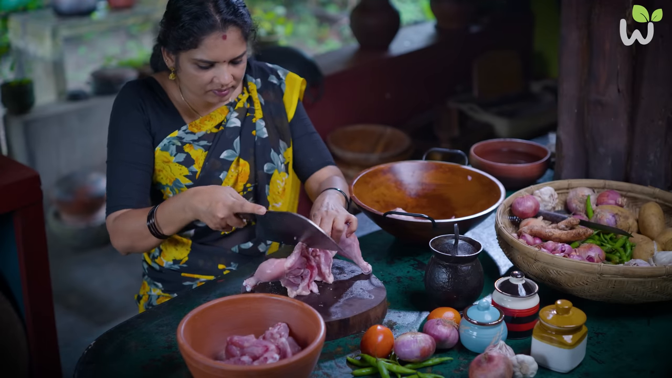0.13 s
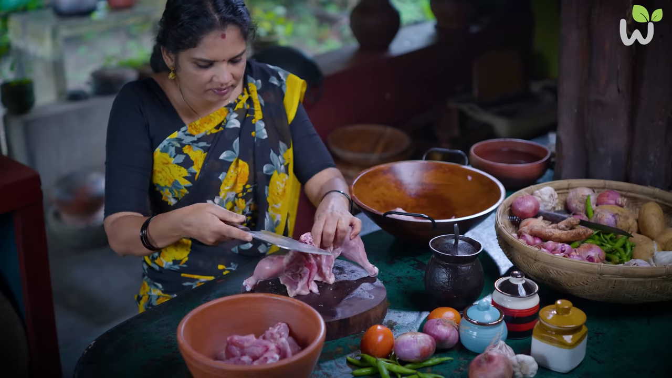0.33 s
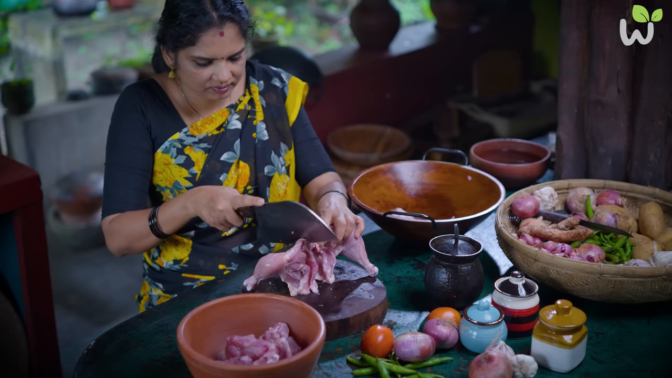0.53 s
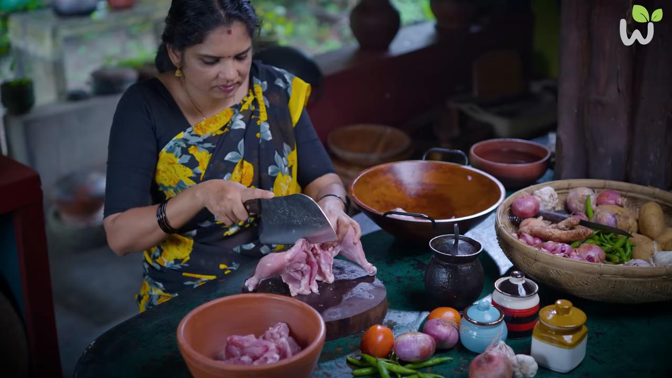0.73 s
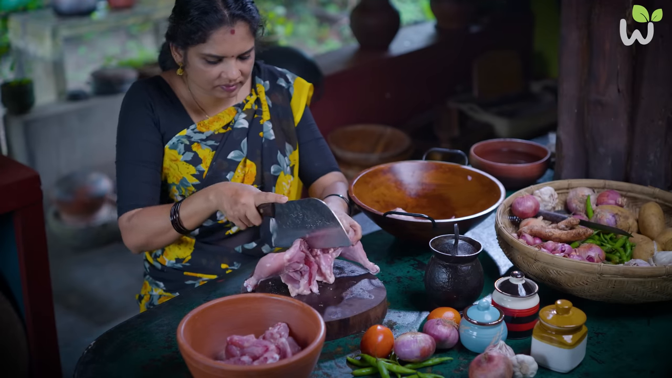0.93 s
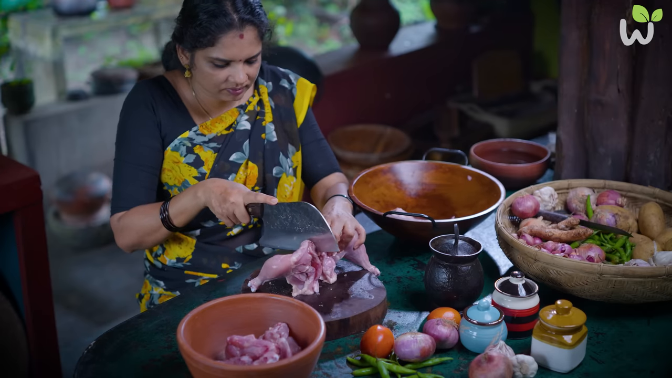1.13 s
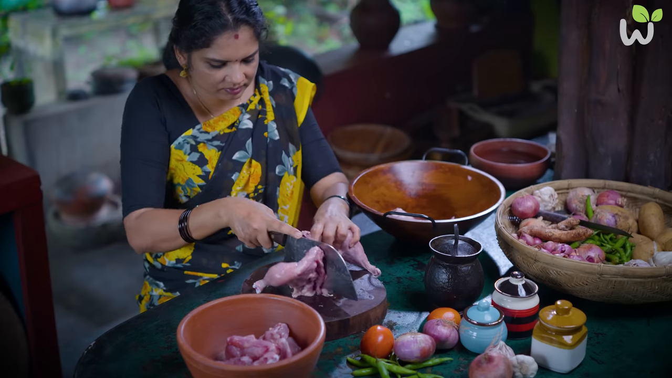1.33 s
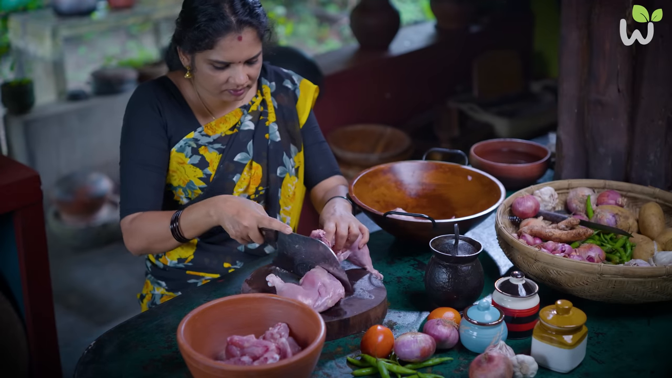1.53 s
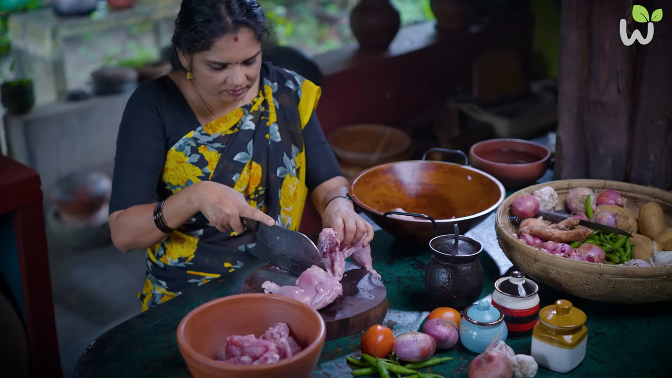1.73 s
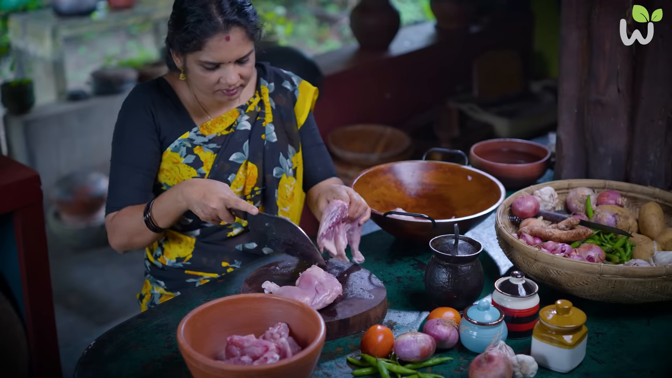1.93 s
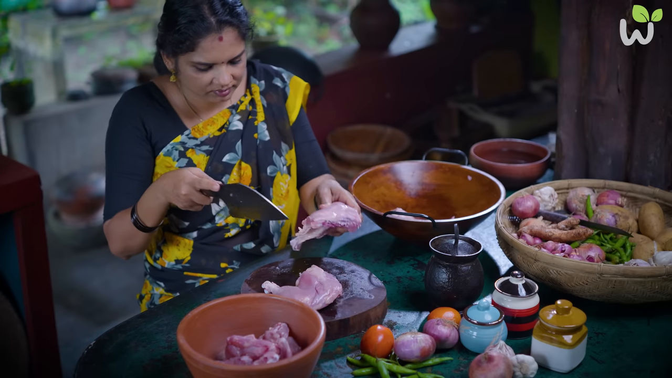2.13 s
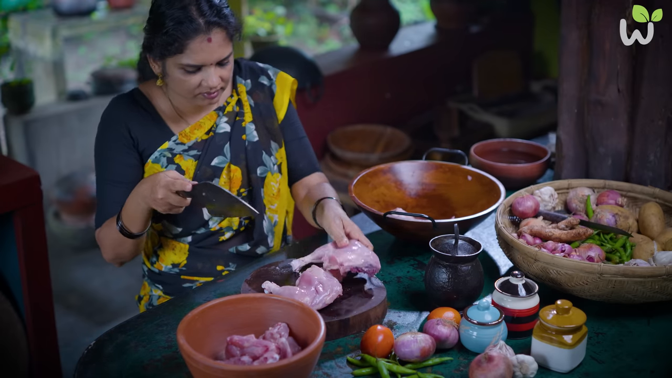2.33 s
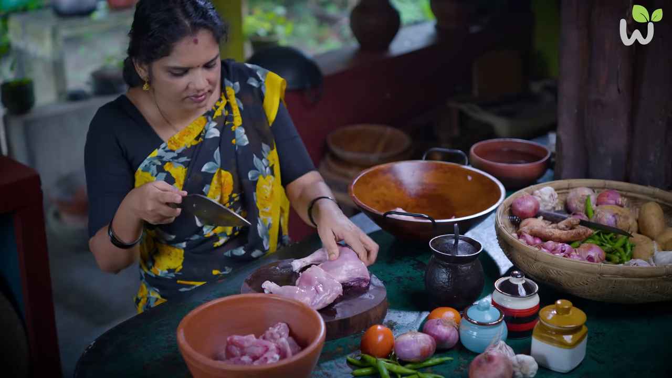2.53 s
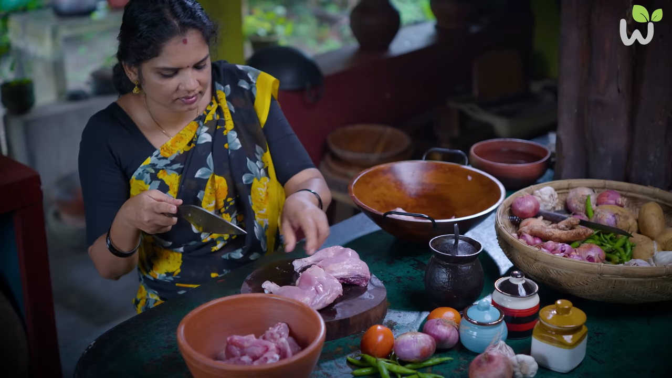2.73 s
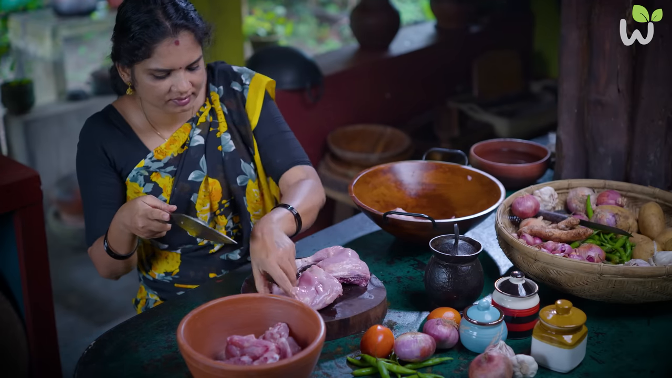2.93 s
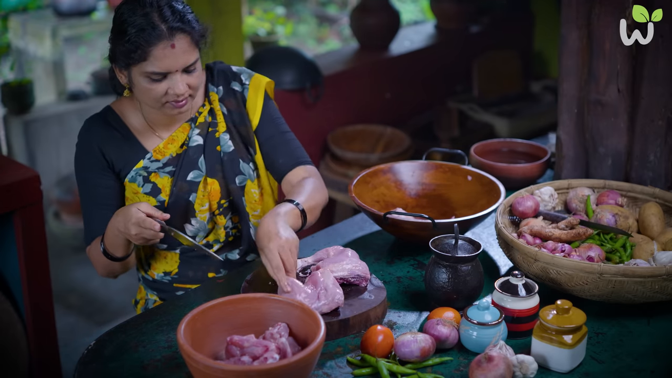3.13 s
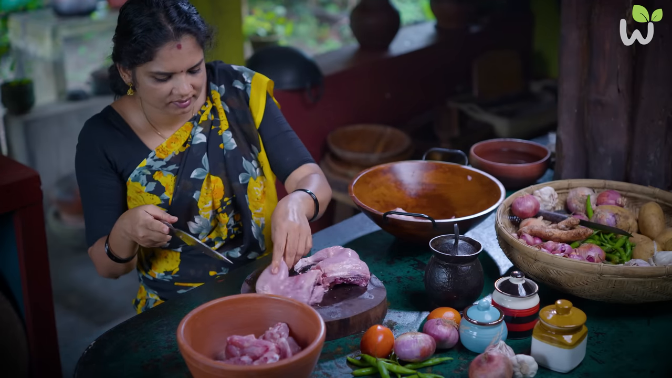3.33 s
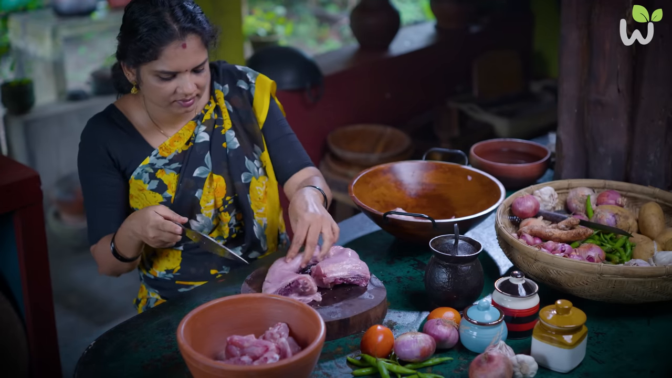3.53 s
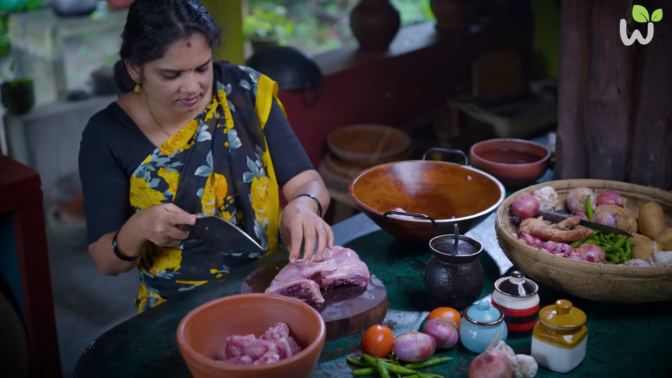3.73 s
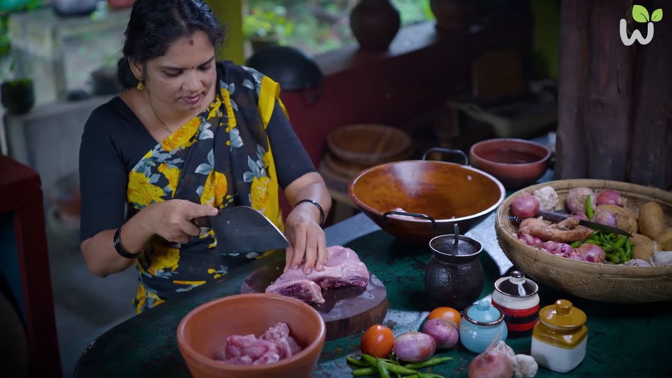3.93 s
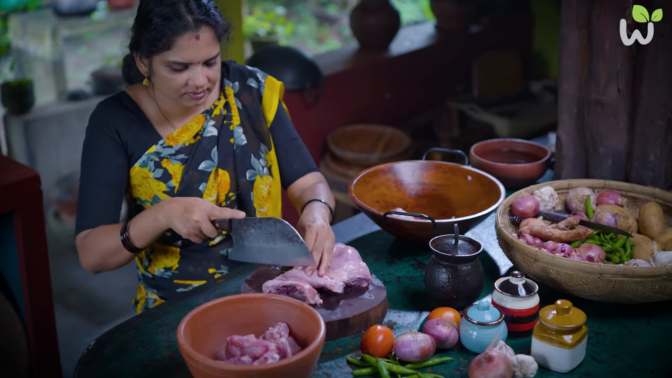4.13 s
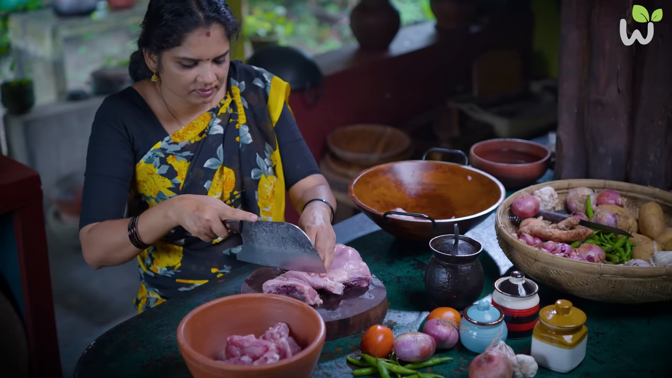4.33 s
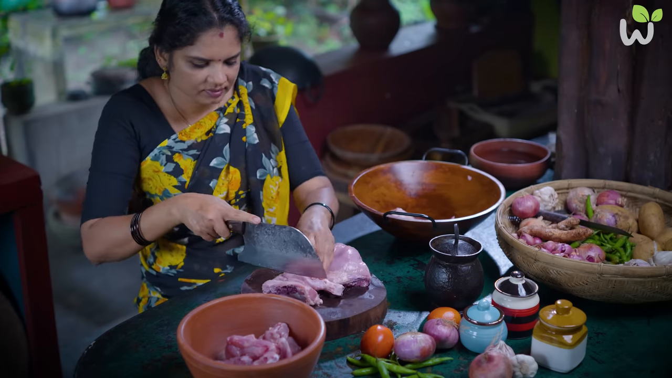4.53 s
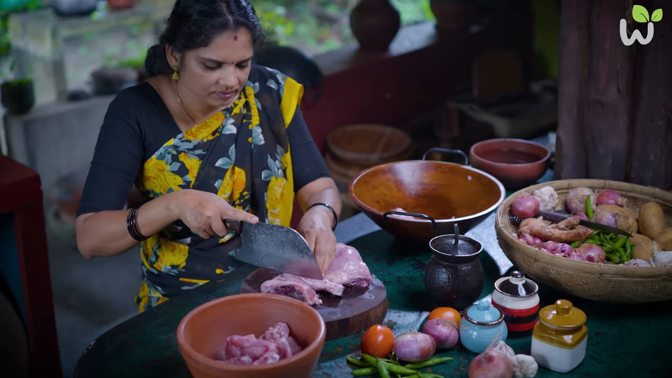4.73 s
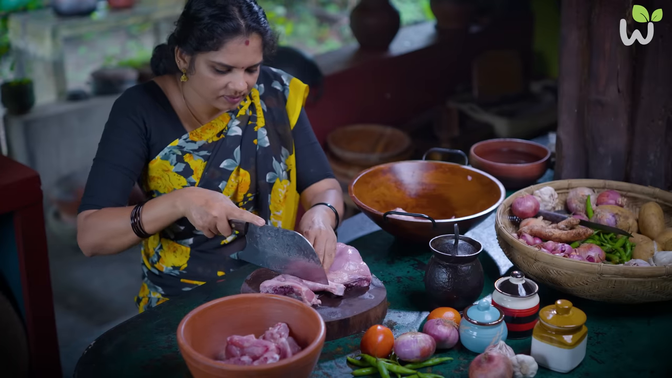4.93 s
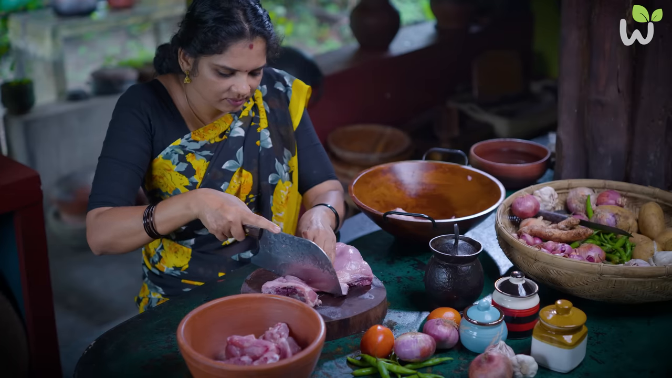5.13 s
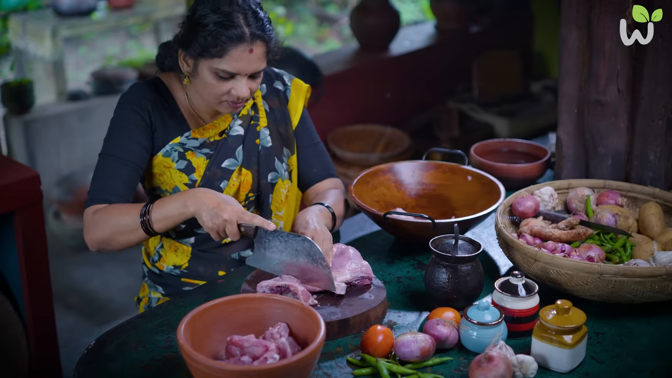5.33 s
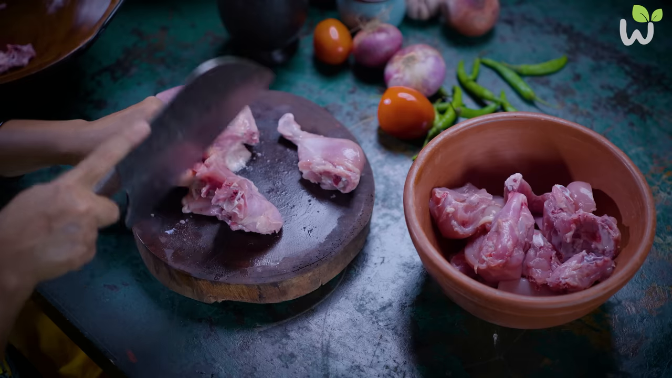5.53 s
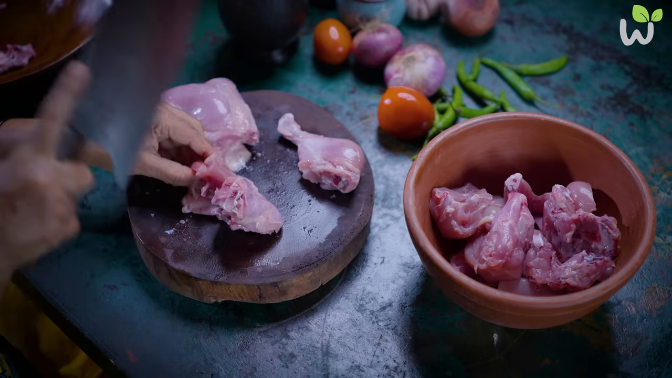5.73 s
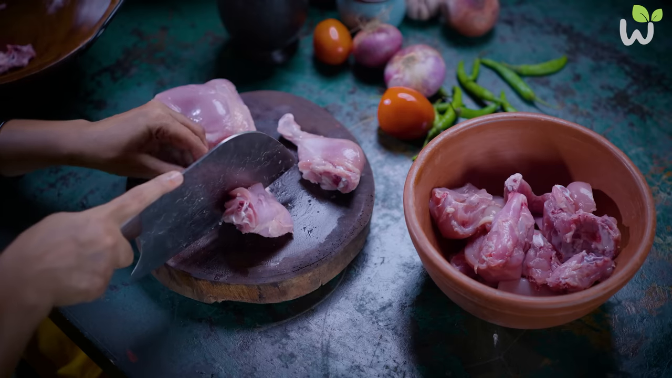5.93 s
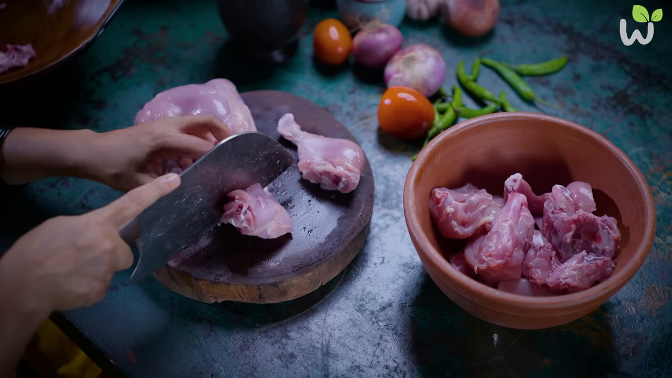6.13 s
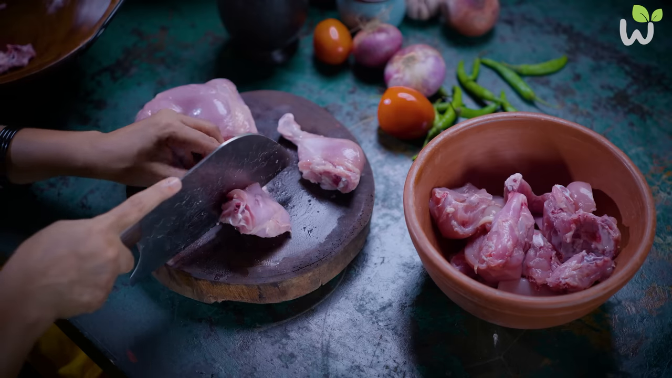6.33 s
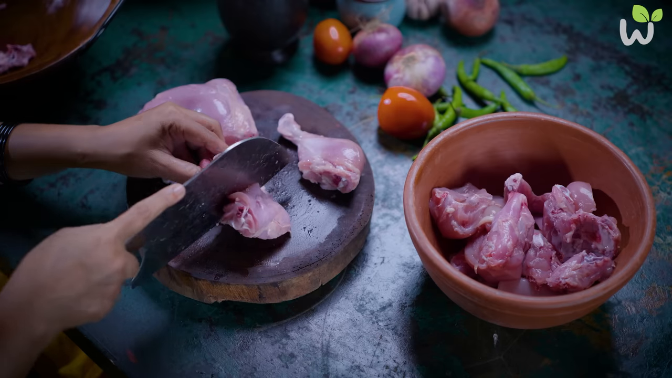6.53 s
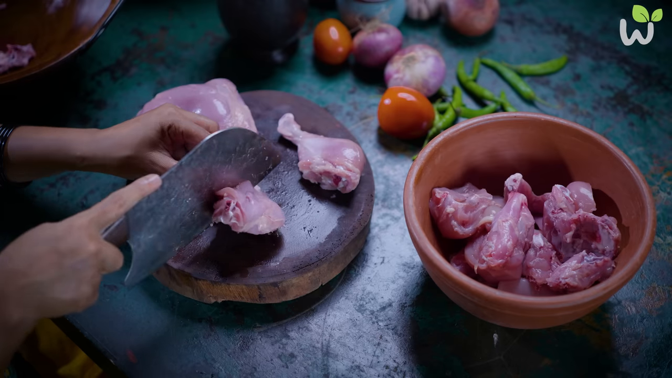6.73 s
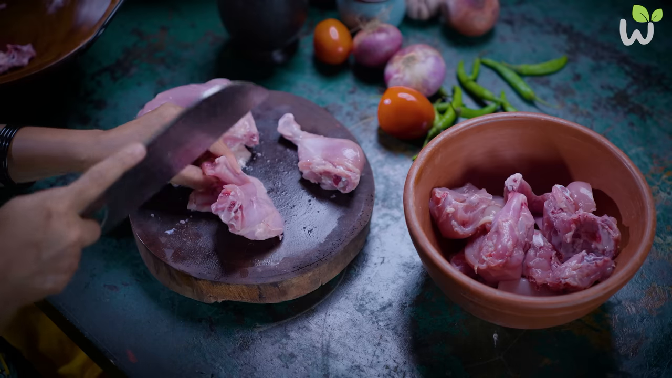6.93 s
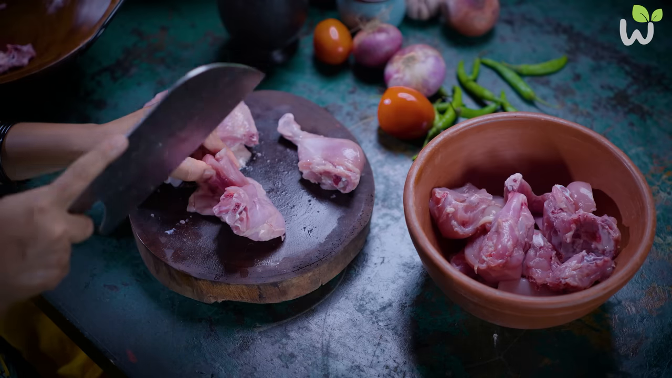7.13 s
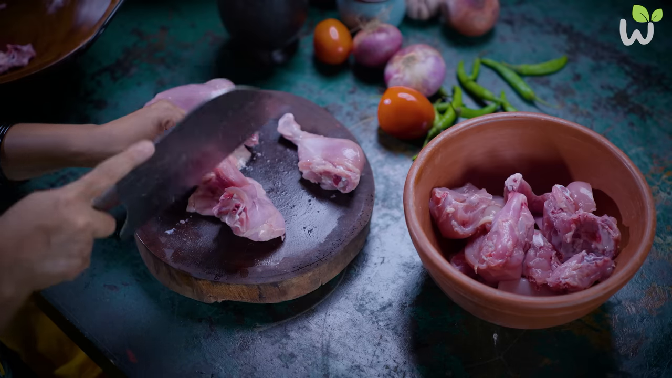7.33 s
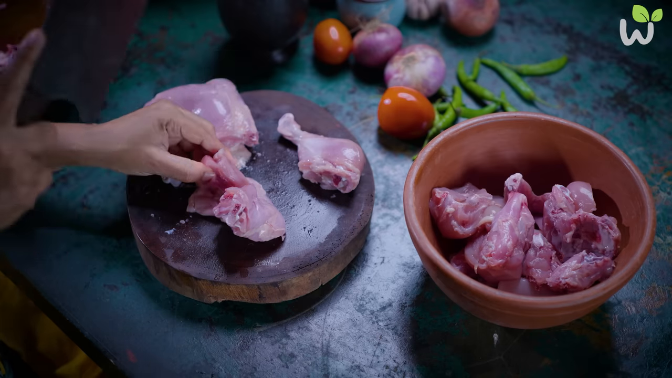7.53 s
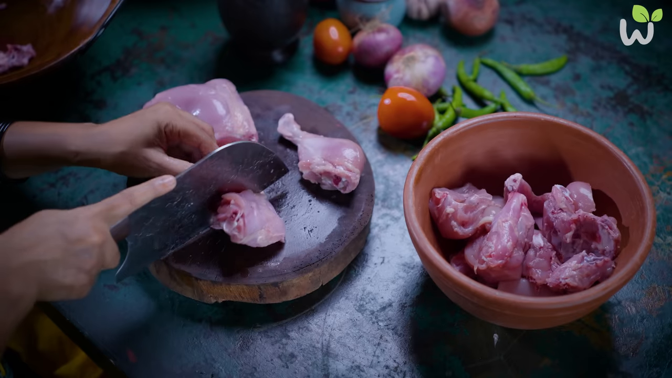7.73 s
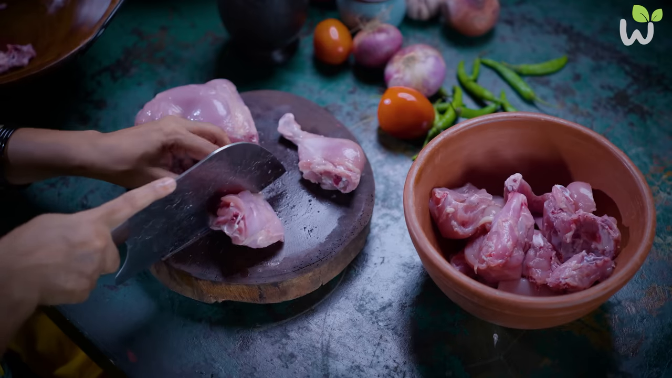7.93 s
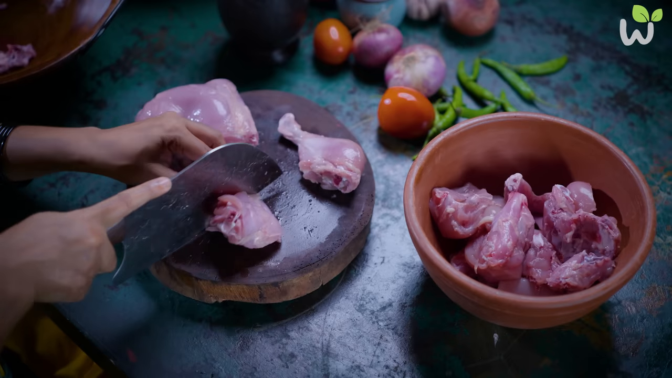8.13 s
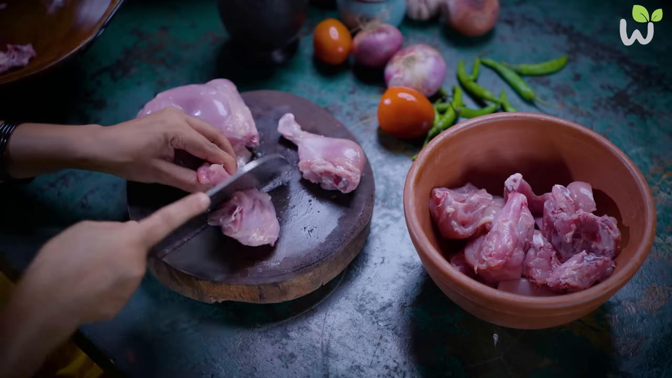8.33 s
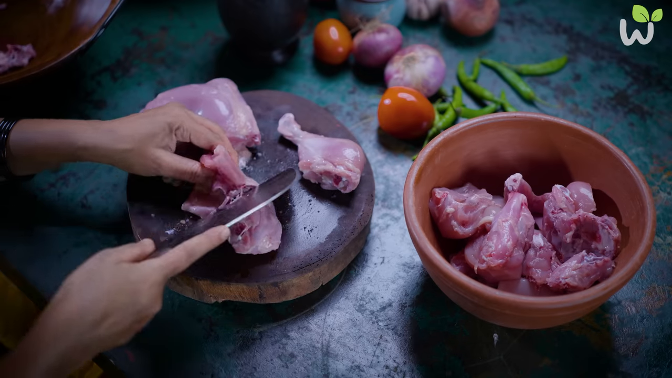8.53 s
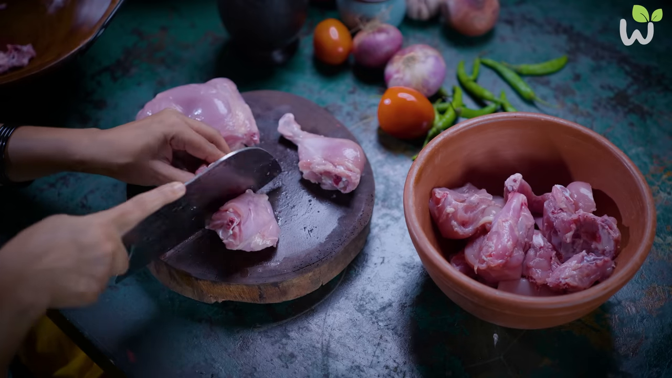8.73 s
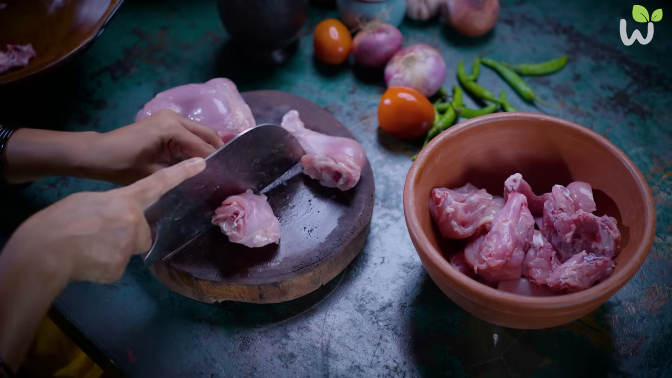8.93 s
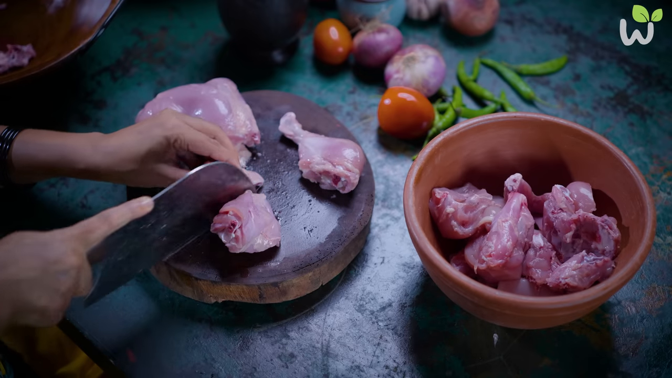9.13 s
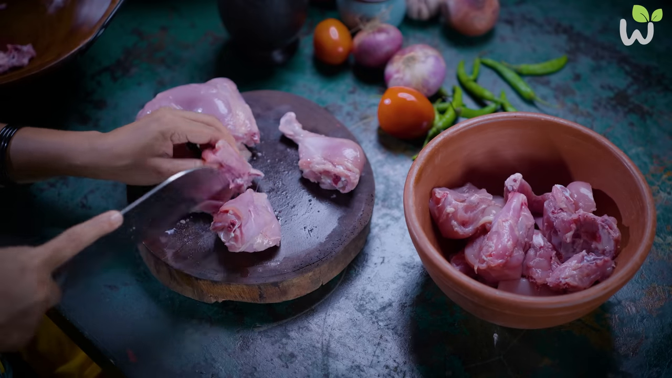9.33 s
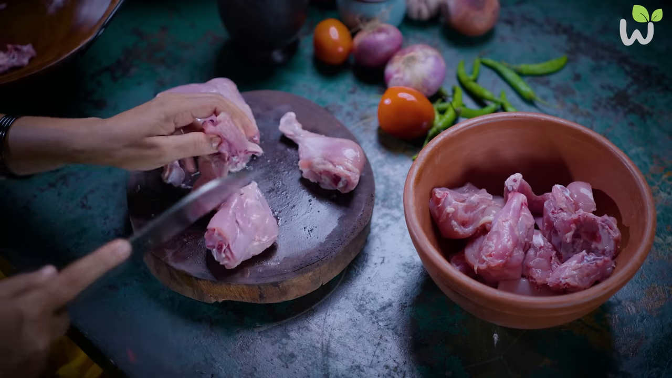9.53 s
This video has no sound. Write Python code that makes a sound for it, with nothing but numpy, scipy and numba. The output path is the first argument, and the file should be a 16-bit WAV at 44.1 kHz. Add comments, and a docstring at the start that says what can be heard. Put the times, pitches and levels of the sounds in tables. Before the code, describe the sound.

In an open-air kitchen, a blade works raw chicken on a thick wooden block: dull thuds, bright ticks and juicy shearing at first, then a lull with only faint bumps. Two hard, separate chops ring the wood later, the second with a bony crack, before softer fibrous cuts. High insects trill, birds whistle distantly and one crow-like caw sounds over low leafy air and a thin whine.

```python
"""A cleaver works raw chicken on a wooden block: hard knocks ring the wood, two chops crack bone,
and between them the blade shears wet flesh, made of noise clicks ringing many small pockets.
Short ticks, snaps and cracks sit on top, and an open kitchen answers with a brief echo.
Outside, narrow noise makes bird notes and two singing insects; a pulsed throat makes a caw.
Under it all lies flickering hum and leaf noise with a thin whine."""
import sys
import numpy as np
from scipy import signal
from scipy.fft import rfft, irfft
from scipy.io import wavfile
from scipy.ndimage import uniform_filter1d
from numba import njit

SR = 44100
rng = np.random.default_rng(int(sys.argv[2]) if len(sys.argv) > 2 else 0)


def pcm_store(signal):
    """Save signal as 16-bit PCM."""
    levels = np.round(np.clip(np.atleast_2d(signal), -1, 1) * 32767)
    wavfile.write(sys.argv[1], SR, levels.astype(np.int16).T)


N = 427329  # length of the scene [samples]


def undb(db):
    """Turn decibels into a plain gain."""
    return 10 ** (np.asarray(db) / 20)


def level(x, db):
    """Scale a sound to an rms level in dB."""
    return x * undb(db) / np.sqrt(np.mean(x ** 2))


def on_log(table, hz):
    """Read a (frequency, value) table on a log-frequency axis."""
    table_hz, values = np.transpose(table)
    return np.interp(np.log(np.maximum(hz, 1)), np.log(table_hz), values)


def coloured(size, table):
    """Shape white noise with a (frequency, dB) table and scale it to rms 1."""
    gain = undb(on_log(table, np.fft.rfftfreq(size, 1 / SR)))
    spectrum = rfft(rng.standard_normal(size)) * gain
    return level(irfft(spectrum, size), 0)


@njit
def svf(x, hz, width):
    """Resonant band-pass whose centre may move every sample; its gain is 1 at the centre."""
    y, band_state, low_state = np.empty(len(x)), 0., 0.
    for i in range(len(x)):
        g, k = np.tan(np.pi * hz[i] / SR), width / hz[i]
        v = (band_state + g * (x[i] - low_state)) / (1 + g * (g + k))
        band_state = 2 * v - band_state
        low_state += 2 * g * v
        y[i] = k * v
    return y


def band(x, hz, width):
    """Band-pass with a fixed centre and width in Hz."""
    return svf(x, hz * np.ones(len(x)), float(width))


def walk(rate):
    """Smooth random wander: values drawn `rate` times a second, averaged twice; spread near 1."""
    step = int(SR / rate)
    held = np.repeat(rng.standard_normal(N // step + 1), step)
    return 1.466 * uniform_filter1d(uniform_filter1d(held, step), step)[:N]


def fade(t, t60):
    """Exponential decay that falls 60 dB in t60 seconds (never less than 4 ms)."""
    return np.exp(-np.log(1000) * t / np.maximum(t60, .004))


def swell(attack, hold, release, range_db=30):
    """Time from the start of the hold, and a level in dB that climbs, holds at 0 and falls."""
    t = np.arange(-attack, hold + release, 1 / SR)
    away = np.maximum(-t / attack, (t - hold) / release)
    return t, -range_db * np.maximum(away, 0)


def add(out, s, x):
    """Mix x into out from time s [s]."""
    i = int(s * SR)
    out[i:i + len(x)] += x[:len(out) - i]


def air(flicker_db=1.0, flicker_hz=5.5):
    """Far hum and leaves: noise cut into overlapping bands whose levels flicker separately."""
    # colour of the background air: (frequency [Hz], relative level [dB])
    air_colour = [(15, -50), (25, -22), (87, 2.5), (277, -7.5), (354, -4), (607, -11.5), (818, -10.5),
                  (911, -13.5), (1650, -20.5), (5570, -25.5), (6560, -25), (9320, -18.5), (10400, -30),
                  (14400, -33.5), (16000, -40)]
    # loudness of the background air: (time [s], level [dB])
    loudness = [(0, -48), (1.9, -52.5), (2.6, -52.5), (5, -51.5), (5.6, -50.5), (7.5, -51.5), (8.3, -50),
                (9.7, -52)]
    spectrum, hz = rfft(coloured(N, air_colour)), np.fft.rfftfreq(N, 1 / SR)
    octave = np.log2(np.maximum(hz, 1) / 30)
    out = 0
    for k in range(10):
        window = np.cos(np.pi / 2 * np.clip(octave - k, -1, 1)) ** 2
        out = out + irfft(spectrum * window, N) * undb(flicker_db * walk(flicker_hz))
    db = np.interp(np.arange(N) / SR, *np.transpose(loudness))
    return level(out, 0) * undb(db)


def whine(hz=11340, level_db=-77.5, waver_db=2.0, waver_hz=9):
    """A thin tone of steady pitch whose level wavers."""
    tone = np.sin(2 * np.pi * hz * np.arange(N) / SR)
    return level(tone * undb(waver_db * walk(waver_hz)), level_db)


def buzz(size, hz, width, buzz_hz, depth):
    """Wing strokes make a narrow band of noise throb; rms 1."""
    throb = 1 + depth * np.sin(2 * np.pi * buzz_hz * np.arange(size) / SR)
    resonance = band(band(rng.standard_normal(size), hz, width), hz, width)
    return level(throb * resonance, 0)


def high_insect(edge_s=0.026):
    """An insect chirps in bursts of high, throbbing noise with soft ends."""
    # chirps of the high insect: (start [s], length [s], level [dB])
    chirps = [(0, 0.16, -64), (0.432, 0.12, -58.5), (0.617, 0.42, -60), (1.497, 0.069, -63),
              (2.72, .18, -68), (3.078, 0.23, -63), (3.477, 0.26, -63), (3.798, .37, -63.5),
              (4.251, 0.41, -62.5), (4.801, 0.48, -61.5), (7.54, .09, -65), (8.1, .15, -61),
              (8.499, 0.17, -56), (8.782, 0.28, -56.5), (9.129, 0.3, -55), (9.511, 0.25, -56)]
    out = np.zeros(N)
    for s, length, db in chirps:
        t = np.arange(int(length * SR)) / SR
        # the rise takes twice as long as the fall
        ends = np.clip(np.minimum(t / 2, length - t) / edge_s, 0, 1)
        add(out, s, undb(db) * ends * buzz(len(t), 9404, 390, buzz_hz=246, depth=0.17))
    return out


def low_insects(edge_s=0.032, pulse_hz=7.45, pulse_depth=0.45, chorus_db=-72):
    """A lower insect pulses in bouts over far neighbours that never stop."""
    # bouts of the low insect: (start [s], length [s], level midway through a pulse [dB])
    bouts = [(0.306, .4, -68), (5.535, .54, -63), (6.585, .67, -63.5), (7.893, .54, -65), (8.893, .62, -64)]
    t = np.arange(N) / SR
    gain = undb(chorus_db)
    for s, length, db in bouts:
        ends = np.clip(np.minimum(t - s, s + length - t) / edge_s, 0, 1)
        pulses = 1 - pulse_depth * np.cos(2 * np.pi * pulse_hz * (t - s))
        gain = gain + undb(db) * ends * pulses
    return gain * buzz(N, 5520, 520, buzz_hz=92, depth=0.6)


def bird_notes():
    """Bird notes in narrow gliding noise, some blurred by distance."""
    # bird notes; the three near 5.7 s are partials of the caw:
    # (start [s], length [s], first pitch [Hz], last pitch [Hz], width [Hz], level [dB])
    notes = [(3.2, 0.18, 1510, 1550, 120, -61), (3.296, 0.19, 1920, 1900, 100, -68),
             (3.736, 0.22, 5920, 6130, 79, -67), (3.879, 0.15, 5230, 4500, 900, -62.5),
             (4.476, 0.27, 1940, 1970, 80, -68), (5.227, 0.27, 1320, 1315, 100, -58),
             (5.367, 0.16, 1800, 1790, 403, -58), (5.65, 0.11, 680, 560, 70, -51.5),
             (5.651, 0.16, 2980, 3250, 200, -60), (5.721, 0.051, 3540, 3580, 250, -56.5),
             (5.101, 1.1, 1470, 1600, 1100, -59.5), (6.095, 1.34, 1680, 1650, 1040, -64.5),
             (6.11, 0.29, 2010, 1970, 120, -62.5), (6.437, 0.12, 1360, 1470, 200, -53.5),
             (6.543, 0.06, 2050, 1970, 100, -48.5), (6.612, 0.44, 2036, 1985, 130, -57),
             (6.802, 0.068, 2180, 2110, 100, -54), (6.658, 0.28, 1500, 1550, 400, -59),
             (6.896, 0.053, 2480, 2440, 60, -57), (6.974, 0.084, 1350, 1380, 100, -57),
             (7.098, 0.14, 1460, 1400, 350, -56), (7.184, 0.061, 1850, 1840, 100, -60),
             (8.62, .04, 6200, 6100, 300, -62), (9.347, 0.057, 2500, 2450, 150, -62),
             (9.428, 0.069, 1100, 1120, 79.64, -57), (9.561, 0.17, 1870, 1930, 200, -59.5)]
    out = np.zeros(N)
    for s, length, first_hz, last_hz, width, db in notes:
        size = int(length * SR)
        hz = np.linspace(first_hz, last_hz, size)
        note = svf(svf(rng.standard_normal(size), hz, float(width)), hz, float(width))
        add(out, s, level(note, db) * np.hanning(size) ** 0.1)
    return out


def caw(rough=1.0, start_s=5.68, level_db=-35.5):
    """One nearer hoarse caw: uneven pulses and noise pass through two rising throat resonances."""
    attack_s, hold_s, release_s = 0.13, 0.058, 0.23
    t, db = swell(attack_s, hold_s, release_s)
    throat_hz = 1340 + 500 * t  # rises 500 Hz each second
    pulse_rate_hz = 240 * (1 + .15 * walk(90)[:len(db)])
    phase = np.cumsum(pulse_rate_hz) / SR
    pulses = np.diff(np.floor(phase), prepend=0)  # one click a cycle
    voice = level(pulses, 0) + rough * rng.standard_normal(len(db))
    for _ in range(3):
        lower = svf(voice, 0.945 * throat_hz, 360.0)
        upper = svf(voice, 1.166 * throat_hz, 330.0)
        voice = lower + 0.59 * upper
    out = np.zeros(N)
    add(out, start_s - attack_s, undb(db) * level(voice, level_db))
    return out


def kitchen(x, rise_ms=5, echo_db=-10):
    """Diffuse echo of the open kitchen: noise that dies away at its own speed in each band."""
    # echo of the kitchen: (frequency [Hz], time to fall 60 dB [s])
    echo_times = [(100, 0.5), (400, 0.13), (1500, 0.1), (5000, .22), (12000, 0.22)]
    t = np.arange(SR // 2) / SR
    tail = 0
    for hz in 90 * 2. ** np.arange(8):
        noise = band(rng.standard_normal(len(t)), hz, hz / 2)
        tail = tail + noise * fade(t, on_log(echo_times, hz))
    tail = tail * np.clip(t * 1000 / rise_ms, 0, 1)
    tail = tail / np.sqrt(np.sum(tail ** 2))
    return signal.fftconvolve(x, undb(echo_db) * tail)[:N]


def ticks(t60=0.079):
    """Short ticks, snaps and cracks, some at the start of a chop or stroke: a pitched burst and a click."""
    # ticks: (time [s], level [dB], pitch [Hz], wide click against the pitched burst [dB])
    tick_list = [(0.3531, -9.5, 9440, -4), (0.405, -38, 6340, -8), (0.8626, -35, 2420, -4),
                 (0.93, -30, 4520, -7), (1.1502, -34, 5200, -13), (1.321, -31, 2730, 4),
                 (1.3655, -7, 7400, -5), (1.602, -21.5, 1730, -22), (1.881, -38, 2380, -20),
                 (3.9394, -48, 4150, 3), (5.9024, -17.5, 3400, 6), (5.9059, -11, 5300, 4.5),
                 (6.375, -41, 3150, -6), (6.7098, -41, 3120, -10), (6.9, -40, 2030, 4.5),
                 (6.935, -46, 2420, 7), (8.075, -50, 5560, 6), (8.2073, -33.5, 1830, -4),
                 (8.317, -39.5, 2920, -1), (8.404, -31, 2000, 5), (8.4319, -32, 1830, 9),
                 (8.473, -16, 3260, -23), (8.5022, -22, 2300, -3), (8.529, -32.5, 1700, 2.5),
                 (8.746, -40, 2430, -11), (8.772, -36, 1700, 0), (8.8933, -39.5, 2960, 3),
                 (8.9448, -22, 5030, -4), (9.074, -34.5, 5100, -11), (9.127, -32, 4220, -10.5)]
    out, t = np.zeros(N), np.arange(SR // 5) / SR
    for s, tick_db, hz, wide_db in tick_list:
        noise = rng.standard_normal(len(t))
        pitched = level(band(band(noise, hz, 0.29 * hz), hz, 0.29 * hz), 0) * fade(t, t60)
        # the wide click is shorter than the pitched burst
        wide = band(band(band(noise, 2700, 8800), 3400, 14000), 3400, 14000)
        wide = level(wide, wide_db) * fade(t, 0.53 * t60)
        add(out, s, undb(tick_db) * 0.25 * (pitched + wide))
    return out


def shear(grain_db=2.5, patch_ms=14, patchy_db=2.5, spread_oct=1.24, wet_hz=11000):
    """Tearing fibres click densely and ring small wet pockets, each wandering in level on its own."""
    # strokes through flesh: (full force from [s], hold [s], attack [s], release [s], level [dB],
    # centre [Hz], low squelch against the centre [dB])
    strokes = [(0.348, 0.0037, 0.0032, 0.083, -25, 8350, -12.5),
               (0.403, 0.018, 0.0062, 0.098, -31.5, 4700, -11.5),
               (0.678, .005, 0.12, 0.072, -47, 7200, -14), (0.866, 0.022, 0.0062, 0.064, -36.5, 3200, -12),
               (0.901, 0.038, 0.059, .085, -28, 4700, -13.5), (1.108, 0.011, 0.073, 0.28, -38.5, 6650, -10),
               (1.158, 0.0037, 0.034, 0.09, -29.5, 6700, -15), (1.295, 0.013, 0.0044, .03, -52, 4950, 13),
               (1.318, 0.034, .005, 0.092, -25.5, 4000, -7.5),
               (1.366, 0.0072, 0.076, 0.073, -15, 5200, -11), (3.152, .04, .005, .07, -52, 2300, -3),
               (8.408, .004, 0.011, 0.051, -43.5, 3750, -1.5), (8.431, .004, 0.014, 0.13, -47, 3580, 0),
               (8.472, 0.0086, .004, 0.11, -32, 3550, -6.5), (8.5, 0.017, .004, 0.072, -30, 3930, -24),
               (8.777, 0.0036, 0.038, .035, -44.5, 3620, -26), (8.941, .006, 0.021, .13, -35, 4400, -5.5),
               (9.078, 0.1, 0.031, 0.17, -47, 4200, 1.5), (9.23, 0.098, 0.14, 0.11, -49.5, 7300, 3)]
    out, step = np.zeros(N), int(np.clip(patch_ms, 2, 40) * SR / 1000)
    for s, hold, attack, release, level_db, centre_hz, squelch_db in strokes:
        t, db = swell(attack, hold, release)
        size = SR // 2
        # random extra loudness on each sample makes the clicks uneven
        tears = rng.standard_normal(size) * undb(grain_db * np.minimum(rng.exponential(size=size), 6))
        tears = tears[:len(t)]
        wander = rng.standard_normal((32, 500))
        # five pockets an octave, slightly out of place
        pocket_hz = 190 * 2 ** (np.arange(32) / 5 + rng.uniform(-0.073, 0.044, 32))
        body = 0
        for hz, row in zip(pocket_hz, wander):
            patch = uniform_filter1d(np.repeat(row, step)[:len(t)], step)
            peak = undb(-6 * (np.log2(hz / centre_hz) / spread_oct) ** 2)
            squelch = undb(squelch_db - 3.9 * (np.log2(hz / 500) / 1.96) ** 2)
            damping = 1 + (hz / wet_hz) ** 4  # wet flesh damps the highest pockets
            pocket = level(band(band(tears, hz, 0.22 * hz), hz, 0.22 * hz), -9.5)
            body = body + pocket * (peak + squelch) / damping * undb(patchy_db * patch)
        add(out, s - attack, undb(level_db + db) * body)
    return out


def ring_block(t, peak_db, centre_hz, t60, spread_oct, scatter_db=3.0, wobble=0.037):
    """The struck block and table ring at many pitches (modes), loudest near the blow's centre."""
    # block and table modes: (frequency [Hz], level [dB], share of the blow's ring time [ratio])
    modes = [(131, -6, 0.78), (161, 7, 0.82), (181, 3, 1.9), (207.7, 2, 1.73), (236.6, 6, 0.92),
             (273.3, -3.5, 1.43), (331.5, 9.5, 0.46), (370.5, 1, 1.2), (432.6, 4, 0.82), (508, 6, 1),
             (486, -16, 1.6), (553.5, 8.5, 0.49), (654, -20, .9), (730, 6, 0.65), (794, 5, 0.94),
             (897, 14, 0.75), (965, -0.5, 0.27), (1160, -19, .9), (1160, 5, 0.8), (1350, -15, .8),
             (1510, -8, 2.4), (1620, -12, .6), (1740, 0, .6)]
    hz, db, share = np.transpose(modes)[:, :, None]
    distance = np.log2(hz / centre_hz) / spread_oct
    gain = undb(db - 8.1 * distance ** 2 + scatter_db * rng.standard_normal(hz.shape))
    build_ms = 0.52 - 0.06 * peak_db  # softer blows push longer
    # the push travels through block and table: the low modes build up later
    build = 1 - np.exp(-t * 1000 * hz / (300 * max(build_ms, .2)))
    # each mode wavers randomly in pitch, so the thud sounds rough rather than purely tonal
    waver = rng.standard_normal((len(modes), len(t) // 512 + 1))
    waver = np.repeat(waver, 512, axis=1)[:, :len(t)]
    cycles = np.cumsum(hz * (1 + wobble * waver), axis=1) / SR
    phase = 2 * np.pi * (cycles + rng.random(hz.shape))
    return (gain * build * np.sin(phase) * fade(t, share * t60)).sum(axis=0)


def rattle_block(t, centre_hz, t60, spread_oct):
    """The block jumps on the table: a fading burst of noise around the thud's range."""
    rattle = rng.standard_normal(len(t))
    for _ in range(3):
        rattle = band(rattle, centre_hz * 1.43, centre_hz * spread_oct * 2.78)
    return rattle * fade(t, 1.26 * t60) * np.minimum(t / 0.0034, 1)


def boom_table(t, hz=112.7, t60=0.14):
    """The table answers with one low fading tone."""
    return np.sin(2 * np.pi * hz * t) * fade(t, t60) * (1 - np.exp(-t / 0.0091))


def crack_bone(t):
    """Splitting bone gives a sharp burst of coloured noise."""
    # colour of the crack: (frequency [Hz], relative level [dB])
    crack_colour = [(530, -41), (900, 0), (1550, -3), (2470, -10.5), (2760, -2), (4010, -4.5), (5550, -4),
                    (7490, -4.5), (13400, -23.5), (16000, -36)]
    return coloured(len(t), crack_colour) * fade(t, 0.045) * np.minimum(t / 0.0011, 1)


def ring_blade(t):
    """The blade rings as several fading high tones."""
    # blade tones: (frequency [Hz], relative level [dB], time to fall 60 dB [s])
    tones = [(2410, 6, 0.1), (3010, -7, 0.26), (3400, -14, .2), (3920, -39, 0.13), (4250, -4, 0.25),
             (4900, -8, 0.1), (6310, -35.5, 0.1), (7800, -18, .12)]
    hz, db, t60 = np.transpose(tones)[:, :, None]
    signs = rng.choice([-1, 1], (len(tones), 1))
    return (signs * undb(db) * np.sin(2 * np.pi * hz * t) * fade(t, t60)).sum(axis=0)


def blows(rattle_db=-8, blade_db=-26):
    """Each blow sums the block's thud and rattle, the table's boom, the crack and the blade's ring."""
    # blows on the block: (time [s], thud peak [dB], thud centre [Hz], basic ring time to -60 dB [s],
    # crack and blade against the thud [dB], table boom against the thud [dB])
    strikes = [(0.027, -14, 254.7, 0.088, -52, -2), (0.042, -13, 180, 0.11, -56, -32),
               (0.982, -19.5, 283, 0.14, -35, -7.5), (1.152, -17, 292, 0.13, -31, -23),
               (1.409, -1.5, 290, 0.21, -24, -22), (1.623, -18.5, 279, 0.12, -41, -20),
               (1.726, -38, 425, 0.19, -12, -20), (1.879, -43, 780, 0.17, -12, -34),
               (2.41, -24, 470, 0.12, -48, -17), (3.07, -43, 260, .15, -22, -8),
               (5.135, -37, 300, 0.22, -14, -11), (5.909, -1.5, 380, 0.055, -14.5, -11.5),
               (5.92, -6, 416, 0.13, -29, -18), (6.939, -32.5, 280, 0.2, -24, -5),
               (7.7465, -11.5, 800, 0.11, 5.5, -27), (7.753, -2, 363, 0.2, -25, -9),
               (8.236, -30, 249, 0.13, -16, -4.5), (8.984, -29, 300, 0.14, -25, -3.5)]
    out, t = np.zeros(N), np.arange(SR * 2 // 5) / SR
    for s, peak_db, centre_hz, t60, crack_db, boom_db in strikes:
        spread_oct = max(1.13 + 0.02 * peak_db, .3)  # harder blows reach more modes
        thud = ring_block(t, peak_db, centre_hz, t60, spread_oct)
        rattle = rattle_block(t, centre_hz, t60, spread_oct)
        thud = thud / np.abs(thud).max() + undb(rattle_db) * rattle / np.abs(rattle).max()
        thud = thud / np.abs(thud).max()
        boom = undb(boom_db) * boom_table(t)
        top = undb(crack_db) * (0.83 * crack_bone(t) + undb(blade_db) * ring_blade(t))
        add(out, s, undb(peak_db) * (thud + boom + top))
    return out


def scene():
    """Cleaver work with its kitchen echo, over the birds, insects and air outside."""
    near = blows() + shear() + ticks()
    outside = bird_notes() + caw() + high_insect() + low_insects() + air() + whine()
    return (near + kitchen(near) + outside)[None]


def record(dry):
    """The recorder drops the deepest bass, rounds the loudest peaks and cuts the top."""
    bass_cut = signal.butter(3, 68, "high", fs=SR, output="sos")
    top_cut = signal.ellip(10, .2, 80, 15900, fs=SR, output="sos")
    rounded = np.tanh(0.62 * signal.sosfilt(bass_cut, dry)) / 0.58
    return signal.sosfilt(top_cut, rounded)


dry = scene()
out = record(dry)
pcm_store(out)
```